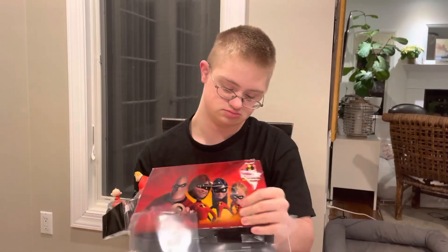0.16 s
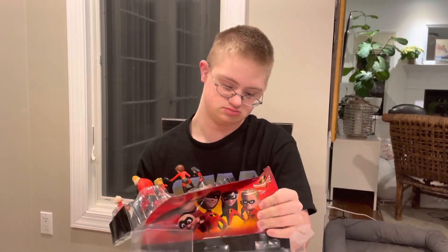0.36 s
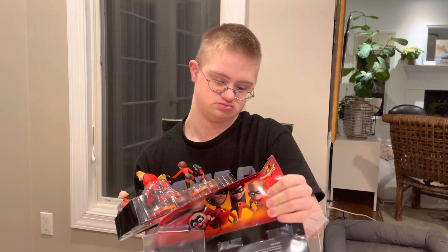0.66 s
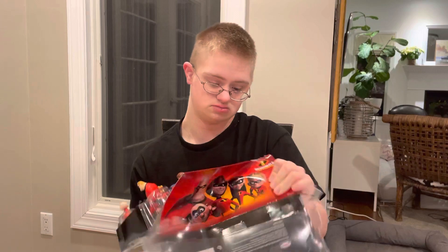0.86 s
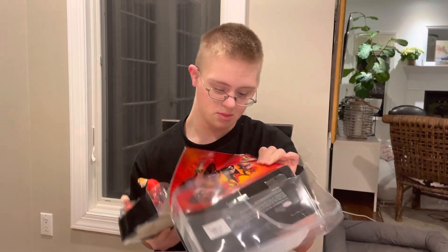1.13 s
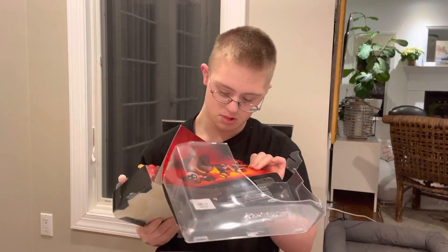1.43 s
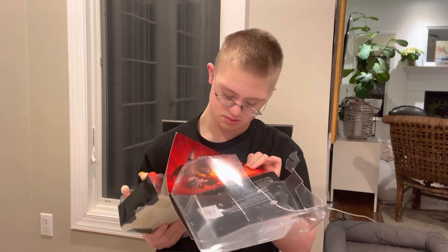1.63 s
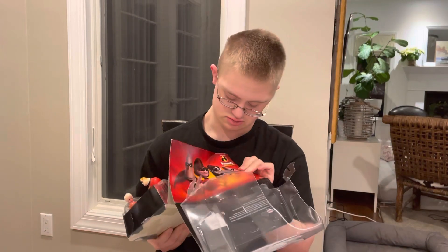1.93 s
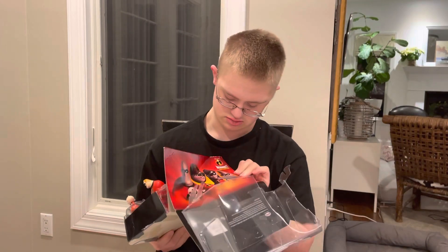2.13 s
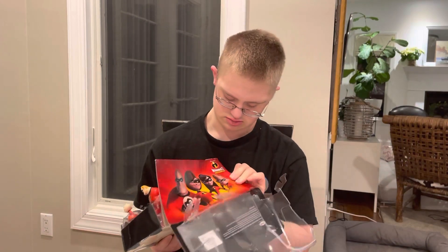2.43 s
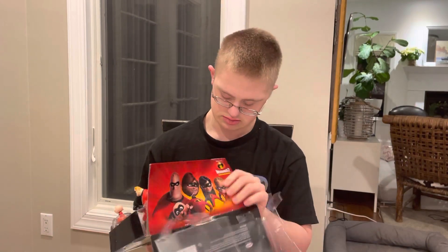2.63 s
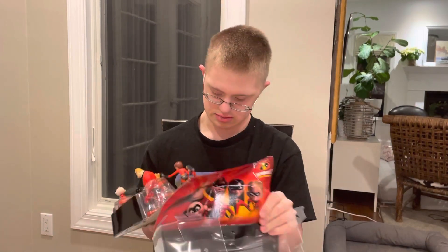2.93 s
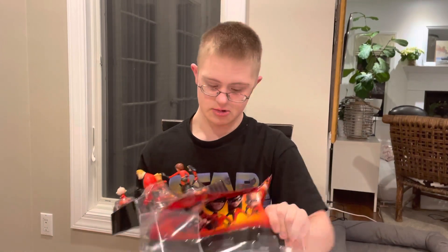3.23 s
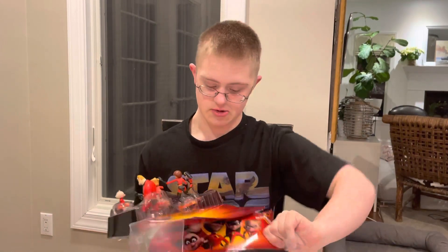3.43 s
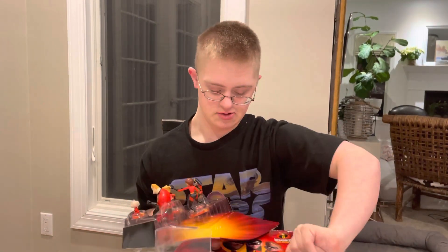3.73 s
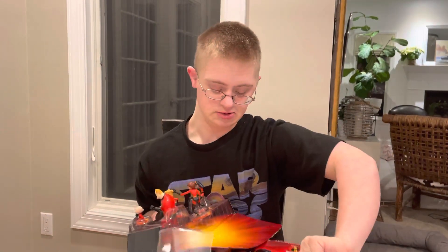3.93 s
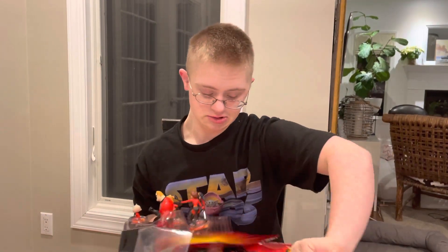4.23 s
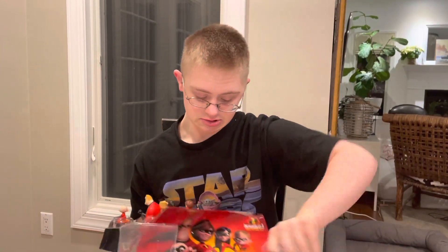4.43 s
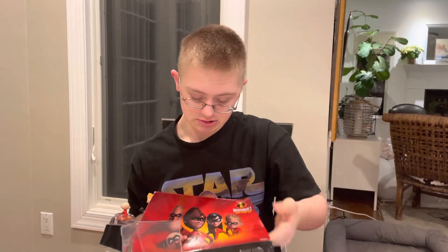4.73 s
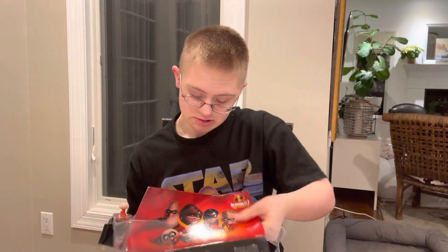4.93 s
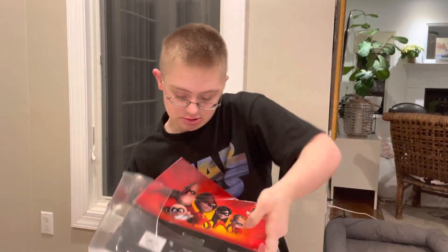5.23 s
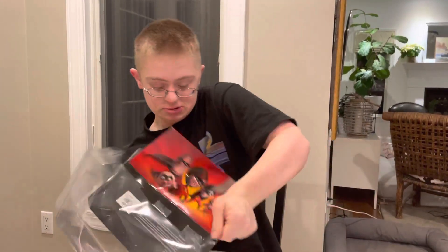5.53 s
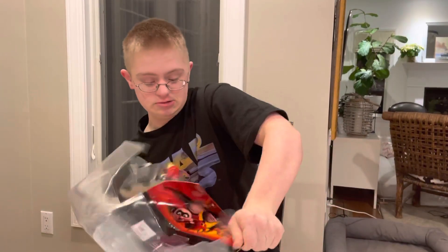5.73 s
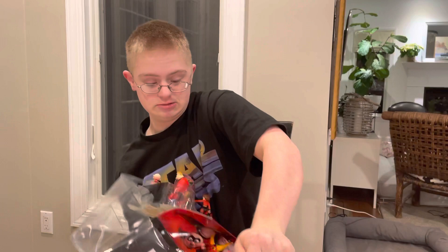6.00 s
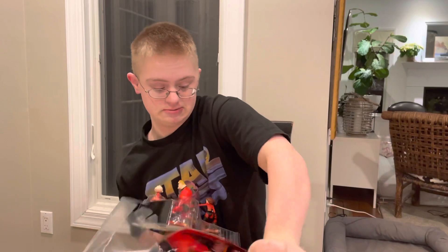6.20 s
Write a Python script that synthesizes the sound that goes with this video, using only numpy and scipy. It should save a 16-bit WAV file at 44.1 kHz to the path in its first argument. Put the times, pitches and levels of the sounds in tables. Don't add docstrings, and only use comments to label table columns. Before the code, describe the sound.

Very close stereo sound of a thin plastic tray being worked out of a cardboard box in a quiet furnished living room, with short reflections and a low hum beneath. From 0 to 0.5 s, rapid hollow pops, crease snaps and soft box thumps; a rough rub near 0.45. Sparser pops around 0.7-0.85, then a single clear snap at 1.23. From about 1.5 to 2.4 it is nearly silent, with faint ticks and rustle. A tiny rising creak leads to a sharp crack at 2.49. Strong pops follow near 2.98 and 3.21, the latter the heaviest. At 3.7-3.8 a scrape carries a brief, thin squeak. Light crackling and sliding run from 4.1 to 5.0, with a snap at 5.15. From 5.35 to 5.7 a bright, dense burst of cracks and scraping; a brief easing, then tumbling hollow buckles and rustle from 6.1 to the end, around 6.4.

```python
import sys
import numpy as np
from scipy import signal
from scipy.fft import rfft, irfft, next_fast_len
from scipy.io import wavfile
from scipy.ndimage import uniform_filter1d, minimum_filter1d

SR = 44100
rng = np.random.default_rng(int(sys.argv[2]) if len(sys.argv) > 2 else 0)


def unload_wav(signal):
    wavfile.write(
        sys.argv[1],
        SR,
        np.round(np.clip(np.atleast_2d(signal).T, -1, 1) * 32767).astype(np.int16),
    )


def voltage_ratio(decibels):
    exponent = np.asarray(decibels, float) / 20
    return 10 ** exponent


N = 280476
SIZE = next_fast_len(N + SR)
BINS = np.arange(SIZE // 2 + 1) * SR / SIZE

# (time [s], bending effort [dB], sliding speed [dB])
HANDS = [(0.0, -45.5, -55.5), (.34, -33.5, -57), (.53, -50, -57), (1.03, -59.5, -67), (1.3, -52.5, -68),
         (1.62, -59.5, -73.5), (2.07, -63, -90), (2.41, -63, -76), (2.55, -52, -53), (2.68, -40, -57),
         (3.17, -36.5, -54.5), (4.11, -48.5, -53), (4.68, -44.5, -61.5), (4.89, -49, -54.5),
         (5.35, -45, -57.5), (5.54, -31.5, -46.5), (5.95, -50, -50.5), (6.36, -32, -48)]
# (time [s], peak [dB], main ring [Hz], crack re peak [dB])
SHARP_BUCKLES = [(0.089, -15.5, 486, -21.5), (0.14, -17, 488, -23), (0.189, -17.5, 321, -32),
                 (0.328, -14, 291.5, -24), (0.398, -20.5, 283, -28), (0.836, -24, 255, -21),
                 (1.002, -51.5, 460, 1), (1.096, -46, 457, -11), (1.145, -42, 545, -10),
                 (1.164, -34, 677, -18.5), (1.233, -23, 476, -16), (1.749, -42, 216, -24),
                 (2.183, -50.5, 390, -4), (2.357, -47, 484, -4.5), (2.484, -19.5, 730, -6.5),
                 (2.487, -5.5, 325, -34), (2.623, -19, 299, -24), (2.72, -19, 770, -16.5),
                 (2.791, -21, 930, -28), (2.919, -22, 337, -15), (3.213, -3, 503, -21),
                 (3.231, -8.5, 503, -22), (3.506, -18, 487, -25.5), (4.132, -29.5, 426, -34),
                 (4.967, -25.5, 680, -19.5), (5.11, -30.5, 347, -18), (5.36, -13, 1005, -13.5),
                 (5.371, -14.5, 474, -18), (5.444, -12.5, 340, -28), (6.113, -23.5, 442, -13)]
# (time [s], peak [dB], main ring [Hz], crack re peak [dB])
SLOW_BUCKLES = [(0.241, -18.5, 352, -30), (0.2915, -12, 361, -25.5), (0.421, -13, 296, -22),
                (0.672, -32, 667, -12), (0.717, -24.5, 364, -13.5), (0.79, -21, 249, -33),
                (1.537, -44, 345, -31), (2.42, -44, 1290, -30), (2.981, -7.5, 760, -16.5),
                (3.028, -11.5, 279, -22), (3.269, -9, 437, -47), (3.327, -12.5, 289, -36),
                (3.579, -22, 419, -28), (4.186, -35.5, 700, -6), (4.256, -32, 305, -23),
                (4.342, -26, 205, -32), (4.479, -29, 326, -27), (4.763, -31, 357, -19),
                (4.866, -30, 240, -19), (5.25, -32, 262, -13.5), (5.464, -14, 706, -9),
                (5.476, -14, 503, -16), (5.572, -28, 372, -11), (5.612, -13.5, 440, -10),
                (6.129, -15, 330, -32), (6.163, -21, 495, -11), (6.189, -19, 337, -29),
                (6.253, -13.5, 293, -22), (6.284, -15.5, 435, -24), (6.304, -12, 275, -34)]
# (frequency [Hz], density [dB per Hz])
SHEET_RATTLE = [(88, -38), (150, -20.5), (231, -9), (286, -3.5), (491, 5), (595, -5), (892, 7), (1020, -25),
                (1500, 8), (1950, -44), (3300, -120)]
# (frequency [Hz], density [dB per Hz])
CARD_SCRAPE = [(2500, -42), (3500, 0.5), (5000, -0.5), (7000, -3.5), (9000, -4), (11000, -9), (13500, -11),
               (16500, -8)]


def rms_one(x):
    return x / np.sqrt(np.mean(x ** 2) + 1e-20)


def in_time(rows):
    s, *columns = np.transpose(rows)
    return [np.interp(np.arange(N) / SR, s, c) for c in columns]


def at_hz(points, hz):
    points = np.array(points)
    return np.interp(np.log(hz + 1), np.log(points[:, 0] + 1), points[:, 1])


def colour(x, spectrum):
    return rms_one(irfft(rfft(x, SIZE) * voltage_ratio(at_hz(spectrum, BINS)), SIZE)[..., :N])


def drift(rate):
    r = np.exp(-80 * np.pi * rate / SR)
    slow = signal.lfilter([1], [1, -2 * r, r * r], rng.standard_normal(N // 40 + 2002))[2000:]
    return np.interp(np.arange(N) / 40, np.arange(len(slow)), rms_one(slow))


def ring(clicks, hz, t60):
    r, w = voltage_ratio(-60 / (t60 * SR)), 2 * np.pi * hz / SR
    return signal.lfilter([0, np.sin(w)], [1, -2 * r * np.cos(w), r * r], clicks + 1e-18)


def struck(table, cycles, gain_db):
    out = np.zeros(N + SR)
    for s, peak_db, hz in table:
        click = np.zeros(SR // 8)
        click[0] = voltage_ratio(peak_db + gain_db)
        at = round(s * SR)
        out[at:at + len(click)] += ring(click, hz, cycles / hz)
    return out[:N]


def grains(per_s, spread_db, clump_db):
    sizes = voltage_ratio(spread_db * np.minimum(rng.exponential(1, N), 4)) * rng.choice([-1, 1], N)
    return sizes * (rng.random(N) < per_s * voltage_ratio(clump_db * drift(25)) / SR)


def rung_grains(slips, low_hz, high_hz, cycles, spectrum):
    dealt = rng.integers(0, 16, N)
    out = np.zeros(N)
    for k, hz in enumerate(np.geomspace(low_hz, high_hz, num=16)):
        out += voltage_ratio(at_hz(spectrum, hz)) * ring(slips * (dealt == k), hz, cycles / hz)
    return rms_one(out)


def thin(x):
    return signal.sosfilt(signal.butter(2, 128, "high", fs=SR, output="sos"), x)


def alike_pair(pair, likeness):
    likeness = np.clip(likeness, 0, 1)
    return np.sqrt(.5 + .5 * likeness) * pair[0] + np.sqrt(.5 - .5 * likeness) * pair[1] * [[1], [-1]]


def room_floor():
    # (frequency [Hz], density [dB per Hz])
    hum_and_air = [(15, -42), (25, -4), (214, -4.5), (404, -20), (575, -14), (694, -15), (1440, -17),
                   (1780, -15.5), (2420, -37), (3450, -32), (7000, -58), (9100, -76), (15400, -120)]
    pair = alike_pair(rfft(rng.standard_normal((2, N)), SIZE), at_hz([(60, 1.0), (500, 0.41), (3000, 0.093)], BINS))
    return voltage_ratio(-60.0) * colour(irfft(pair, SIZE)[:, :N], hum_and_air + [(9000, -73)])


def room():
    # (frequency [Hz], reverberation time [s])
    room_t60 = [(60, 0.13), (250, 0.62), (800, 0.36), (2500, 0.27), (6000, 0.35), (14000, 0.082)]
    # (frequency [Hz], level re direct [dB])
    room_level = [(60, -15), (250, -10), (800, -3), (2500, -3.5), (6000, -6.5), (9000, -5), (14000, -8)]
    # (frequency [Hz], left-right likeness [0..1])
    room_likeness = [(60, 0.48), (250, 0.64), (800, 0.049), (3000, 0.018), (14000, 0.041)]
    t, tail = np.arange(SR) / SR, 0
    white = rng.standard_normal((2, SR)) * np.clip((t - .003) / 0.0037, 0, 1)
    for hz in 44 * 2 ** np.arange(0, 9.):
        dying = white * voltage_ratio(-60 * t / at_hz(room_t60, hz))
        share = np.clip(1 - np.abs(np.log2((BINS + 1) / hz)), 0, 1)
        tail = tail + share * rfft(dying / np.sqrt(np.sum(dying[0] ** 2)), SIZE)
    return alike_pair(tail, at_hz(room_likeness, BINS)) * voltage_ratio(at_hz(room_level, BINS))


def booms():
    # (time [s], peak [dB], pitch [Hz])
    low_blows = [(0.097, -38, 116), (0.299, -38, 127), (0.419, -26, 199), (0.719, -46, 91.5),
                 (0.793, -39, 121), (2.495, -33, 199), (2.529, -36, 127), (2.635, -35, 110),
                 (2.985, -24, 199), (3.219, -27, 180), (3.329, -32, 199), (3.745, -38, 124),
                 (4.199, -50, 137), (4.344, -36, 129), (5.159, -36, 178), (5.449, -37, 199),
                 (5.609, -39, 121), (6.129, -42, 161), (6.25, -30, 194)]
    return signal.lfilter(*signal.butter(2, 260, fs=SR), struck(low_blows, cycles=24, gain_db=-4))


def rub():
    # (frequency [Hz], level re sliding speed [dB])
    tray_resonances = [(1750, -6.5), (2500, -12), (3900, -12)]
    slide_db = in_time(HANDS)[1]
    friction = rng.standard_normal(N) * voltage_ratio(3.0 * drift(9.7))
    return voltage_ratio(slide_db) * sum(voltage_ratio(level_db) * rms_one(ring(friction, hz, t60=0.0072)) for hz, level_db in tray_resonances)


def squeak():
    # (time [s], pitch [Hz], level [dB])
    edge_squeak = [
        (3.68, 860, -70),
        (3.71, 849, -54),
        (3.75, 792, -41),
        (3.79, 799.4, -40.5),
        (3.83, 830, -71),
        (3.95, 833, -68),
        (4.3, 820, -60),
        (4.45, 830, -66),
    ]
    # (multiple of the pitch [1], level [dB])
    partials = [(1, 5), (2.15, -0.5), (3.1, 0), (4.9, -12)]
    hz, level_db = in_time(edge_squeak)
    turn = 2 * np.pi * np.cumsum(hz * (1 + 0.0148 * drift(40.0))) / SR
    lines = sum(voltage_ratio(part_db + 1.5 * drift(50)) * np.sin(multiple * turn) for multiple, part_db in partials)
    return voltage_ratio(level_db) * lines * (level_db > np.min(level_db))


def creak():
    # (time [s], pitch [Hz], level [dB])
    strain = [
        (2.36, 1000, -72),
        (2.405, 1200, -59),
        (2.425, 1453, -49),
        (2.45, 1950, -47),
        (2.47, 1900, -54),
        (2.485, 1800, -62),
    ]
    width_hz = 520
    hz, level_db = in_time(strain)
    turn = 2 * np.pi * np.cumsum(hz) / SR
    line = drift(width_hz) * np.sin(turn) + drift(width_hz) * np.cos(turn)
    t = np.arange(N) / SR
    return voltage_ratio(level_db) * line * ((t > strain[0][0]) & (t < strain[-1][0]))


def drags():
    # (time of the height [s], fall [s], low [dB], bright [dB], chatter [Hz])
    rough_drags = [(.46, 0.059, -37.5, -42, 3240), (5.655, 0.045, -29, -50, 2200),
                   (1.86, 0.074, -69, -72.5, 3500), (2.405, 0.055, -64, -61.5, 1350),
                   (5.385, 0.036, -43, -37.5, 2500), (2.514, 0.041, -48, -38, 2400),
                   (3.25, 0.038, -50, -38.5, 2500), (4.33, 0.063, -55, -54, 3900),
                   (4.8, 0.053, -55, -50.5, 2600), (2.74, .03, -51, -49, 2390),
                   (1.55, 0.091, -64, -74, 1500), (2.455, 0.017, -72, -45, 1530),
                   (3.009, 0.068, -26.5, -38.5, 2300), (3.439, 0.077, -47, -51, 3900),
                   (3.72, 0.06, -46, -39.5, 2675), (3.794, .018, -31.5, -27, 2700),
                   (3.885, .022, -56, -39.5, 2470), (4.395, 0.015, -43, -41.5, 3050),
                   (4.502, 0.028, -36, -69, 1810), (4.552, 0.0098, -45, -47, 2420),
                   (4.585, 0.056, -35, -60, 2430), (4.95, 0.036, -42.5, -52, 2420),
                   (5.153, 0.018, -31.5, -29, 2430), (5.48, 0.048, -44, -28, 2100),
                   (5.842, 0.054, -38.5, -37, 3530), (6.018, 0.031, -44, -41.5, 4050),
                   (6.151, 0.045, -36, -33.5, 2000), (6.2, 0.042, -35, -34, 3340),
                   (6.27, 0.044, -27, -31.5, 5100)]
    t, out = np.arange(N) / SR, np.zeros(N)
    low = rung_grains(grains(1500, spread_db=1.5, clump_db=3.0), 205.0, 1003, 6.4, SHEET_RATTLE)
    slips = rms_one(grains(2700, spread_db=1.0, clump_db=3.5))
    hiss = colour(slips, [(900, 1.1), (1600, 4.4)] + CARD_SCRAPE[1:])
    for s, fall, low_db, bright_db, hz in rough_drags:
        near = slice(max(round((s - .2) * SR), 0), round((s + .3) * SR))
        width = np.where(t[near] < s, 0.71 * fall, fall)
        force = np.exp(-((t[near] - s) / width) ** 2)
        chatter = rms_one(ring(slips[near], hz, 61.0 / hz))
        out[near] += force * (voltage_ratio(low_db) * low[near] + voltage_ratio(bright_db) * (hiss[near] + 0.075 * chatter))
    return out


def ticks():
    # (time [s], peak [dB], pitch [Hz])
    small_creases = [(0.238, -30.5, 5330), (1.2341, -27.5, 3530), (2.489, -16.5, 3860), (3.328, -26, 2490),
                     (4.446, -40, 4500), (0.1885, -27.5, 2180), (0.277, -30.5, 2430), (0.3264, -29, 1840),
                     (0.398, -28.5, 2540), (0.4419, -25.5, 3380), (1.4072, -43.5, 3100),
                     (2.1848, -50, 2060), (2.9745, -20, 2030), (3.0765, -20.5, 2270), (3.4104, -30.5, 4000),
                     (3.4372, -35, 3700), (3.579, -29.5, 2450), (3.7542, -25, 2570), (3.7834, -26, 2520),
                     (3.9843, -40, 2370), (4.3924, -35, 2270), (4.5155, -40, 3440), (4.9645, -31, 2380),
                     (5.3414, -40, 1880), (5.361, -19, 2250), (5.434, -22, 2000), (5.467, -12, 2140),
                     (6.08, -33, 3370), (6.1424, -32, 3630), (6.2443, -23, 1960)]
    out, t = np.zeros(N + SR), np.arange(SR // 40) / SR
    dull = signal.butter(1, [1200, 6000], "band", fs=SR)
    for s, peak_db, hz in small_creases:
        tone = np.sin(2 * np.pi * hz * t) * voltage_ratio(-60 * t / 0.0093)
        burst = 0.92 * rng.standard_normal(len(t)) * voltage_ratio(-60 * t / 0.0083)
        at = round(s * SR)
        out[at:at + len(t)] += voltage_ratio(peak_db + 1.5) * (tone + burst)
    return signal.lfilter(*dull, out[:N])


def snaps():
    # (time [s], peak [dB], pitch [Hz])
    hard_creases = [(0.0881, -20, 1670), (0.1395, -26, 1980), (0.2368, -31, 1500), (0.2504, -34, 2120),
                    (0.2762, -29, 2860), (0.2966, -25, 2480), (0.3266, -19.5, 1830), (0.3444, -30, 1850),
                    (0.398, -27, 2600), (0.4178, -25, 1890), (0.44, -26, 3210), (0.4554, -32, 1540),
                    (0.7164, -29, 1640), (0.8339, -31, 1550), (1.233, -18, 1630), (2.4842, -17, 2350),
                    (2.4884, -14, 1590), (2.5114, -26, 1640), (2.5374, -27, 2320), (2.6228, -32, 1590),
                    (2.719, -19, 1550), (2.791, -27, 1730), (2.9206, -28, 1660), (2.9784, -7, 2040),
                    (3.0347, -17, 1590), (3.1641, -31, 1720), (3.2103, -18, 1880), (3.2312, -10, 2860),
                    (3.3272, -24, 1720), (3.5053, -34, 2400), (3.669, -33, 1820), (3.7863, -19, 2460),
                    (3.869, -29, 2400), (4.3094, -40, 1730), (4.398, -32, 2780), (4.544, -32, 2310),
                    (4.5527, -25, 2110), (4.6344, -43, 1570), (4.964, -32, 1500), (5.1456, -16.5, 2190),
                    (5.3504, -29, 1500), (5.3596, -14, 2210), (5.3704, -18, 2310), (5.4433, -12.5, 2060),
                    (5.476, -8, 1610), (5.5444, -19, 1550), (5.61, -19, 2070), (5.655, -23, 2330),
                    (5.69, -29, 2030), (5.7318, -31, 1950), (5.8036, -37, 2220), (5.8181, -28, 1650),
                    (6.1117, -23, 1480), (6.1274, -29, 1500), (6.1634, -20, 1880), (6.1762, -21, 1630),
                    (6.25, -24, 2060), (6.264, -23, 1690), (6.2861, -21, 2010), (6.3026, -21, 1500)]
    # (time [s], peak [dB], pitch [Hz])
    panels = [(0.093, -24, 474), (0.145, -22, 487), (0.242, -21, 316), (0.261, -24, 285), (0.297, -17, 377),
              (0.331, -16.5, 310), (0.351, -18, 261), (0.421, -13.5, 256), (0.793, -27.5, 253),
              (0.836, -30, 256), (2.496, -13, 438), (2.626, -26, 293), (2.98, -12.5, 431),
              (3.211, -17, 515), (3.239, -16, 493), (3.274, -12.5, 447), (3.334, -19, 300),
              (4.344, -25.5, 148), (4.494, -28, 297), (4.569, -26, 304), (4.599, -26, 436),
              (5.384, -21, 544), (5.453, -20, 436), (5.489, -20, 614), (5.624, -20, 350), (5.654, -19, 689),
              (6.116, -21.5, 304), (6.13, -16, 318), (6.144, -24, 283), (6.186, -25, 339),
              (6.219, -25, 660), (6.255, -17, 296), (6.267, -19, 288), (6.286, -20, 331), (6.311, -21, 272),
              (6.333, -21, 342)]
    upper = [(s, peak_db, min(hz * 2.3, 15000)) for s, peak_db, hz in hard_creases]
    thump = signal.lfilter(*signal.butter(1, 900, fs=SR), struck(panels, cycles=12.3, gain_db=-2.5))
    return struck(hard_creases, cycles=12.5, gain_db=-3) + struck(upper, cycles=7.4, gain_db=-9.0) + thump


def rim():
    # (time [s], peak [dB], pitch [Hz])
    rim_snaps = [(5.352, -28, 1140), (.0895, -24, 790), (.142, -20.5, 1200), (0.3, -31, 910),
                 (2.485, -21.5, 1440), (2.72, -21, 1630), (2.98, -16, 1150), (5.372, -19, 1110),
                 (5.445, -14.5, 1070), (.1895, -27, 1040), (.42, -23.5, 716), (2.4895, -15, 1620),
                 (5.371, -20, 4200), (1.2348, -18, 1037), (1.2345, -19, 1290), (2.4888, -9.5, 1014),
                 (3.213, -8, 905), (.293, -25, 860), (2.791, -29, 930), (3.234, -18, 760),
                 (3.506, -24, 850), (5.156, -23, 1060), (5.577, -27, 890), (6.165, -24, 877),
                 (5.8, -19, 950), (6.334, -24, 875), (5.467, -16, 1000), (.791, -28.5, 715)]
    return struck(rim_snaps, cycles=24.6, gain_db=0.5)


def shudder():
    level_db, rise_s, t60_s = -26, 0.026, 0.48
    s, peak_db = np.transpose(SHARP_BUCKLES + SLOW_BUCKLES)[:2]
    power = np.zeros(N)
    power[(s * SR).astype(int)] = voltage_ratio(peak_db + level_db) ** 2
    fall, rise = voltage_ratio(-120 / (t60_s * SR)), np.exp(-1 / (rise_s * SR))
    return np.sqrt(signal.lfilter([1 - rise], np.convolve([1, -fall], [1, -rise]), power + 1e-18))


def handling():
    # (frequency [Hz], density [dB per Hz])
    box_rumble = [(24, -40), (40, -14), (113, 0), (145, -6), (231, -6.5), (300, -3), (390, -21),
                  (660, -120)]
    # (frequency [Hz], width [Hz], level re box rumble [dB])
    standing_wave = (127.3, 12, -4)
    bend_db, slide_db = in_time(HANDS)
    tremble = shudder()
    box = colour(rng.standard_normal(N), box_rumble) * voltage_ratio(2.0 * drift(7.3))
    hz, width_hz, boom_db = standing_wave
    boom = rms_one(ring(rng.standard_normal(N), hz, 2.6 / width_hz)) * voltage_ratio(boom_db)
    sheet = thin(rung_grains(grains(500, spread_db=2.5, clump_db=5.0), 163.3, 1228, 17.0, SHEET_RATTLE))
    crease_slips = grains(900, spread_db=-2.0, clump_db=5.5)
    creases = thin(rung_grains(crease_slips, 1077, 4040, 12.4, [(1100, -3.0), (3600, -4)]))
    scrape = colour(grains(3500, spread_db=2.5, clump_db=3.5), [(1800, -40)] + CARD_SCRAPE)
    box_db = bend_db.mean() + 0.72 * (bend_db - bend_db.mean()) - 7.5
    crease_db = bend_db + 0.47 * (slide_db - bend_db) - 2.5
    return (np.hypot(voltage_ratio(box_db), tremble * voltage_ratio(-4)) * (box + boom)
            + np.hypot(voltage_ratio(bend_db - 5), tremble) * sheet
            + np.hypot(voltage_ratio(crease_db), tremble * voltage_ratio(-5.5)) * creases
            + np.hypot(voltage_ratio(slide_db - 2), tremble * voltage_ratio(-24)) * scrape)


def buckles(table, rise):
    # (frequency [Hz], level re peak [dB])
    plate_modes = [(200, -28.5), (300, -18.5), (600, -21), (1000, -14.5), (1700, -30)]
    out, clacks, cracks = np.zeros((3, N + SR))
    t = np.arange(SR // 7) / SR
    onset = 1 - np.exp(-(t / rise) ** 2)
    clack_fall = voltage_ratio(-60 * t / (0.025 + 5.3 * rise)) + 0.16 * voltage_ratio(-60 * t / 0.16)
    crack_fall = voltage_ratio(-60 * t / (0.012 + 6.9 * rise)) + 0.24 * voltage_ratio(-60 * t / 0.15)
    for (s, peak_db, low_hz, crack_db), draw in zip(table, rng.random((len(table), 3, 26))):
        high_hz = 868 * (1 + .25 * (draw[0, 1] - .5))
        clack_db = -13 + 0.3 * (crack_db + 18.5) + 0.14 * (peak_db + 19)
        hz = np.r_[low_hz, high_hz, 220 * 7.5 ** draw[0, 2:]][:, None]
        plate_db = at_hz(plate_modes, hz[2:, 0]) + 8.0 * (draw[1, 2:] - .5)
        level = voltage_ratio(np.r_[-11.5, -6.0, plate_db])[:, None]
        life = 0.079 * (600 / hz) ** 0.73
        life[1] *= .45
        late = np.maximum(t - (2.482 / hz + 2 * rise) * draw[2][:, None], 0)
        swell = 1 - np.exp(-late * hz / 0.78)
        body = np.sum(level * swell * np.sin(2 * np.pi * hz * late) * voltage_ratio(-60 * late / life), axis=0)
        start = round((s - rise) * SR)
        here = slice(start, start + len(t))
        out[here] += voltage_ratio(peak_db) * body
        clacks[here] += voltage_ratio(peak_db + clack_db) * onset * clack_fall
        cracks[here] += voltage_ratio(peak_db + crack_db) * onset * crack_fall
    return np.array([out, clacks, cracks])[:, :N]


def pops():
    # (frequency [Hz], density [dB per Hz])
    clack_spectrum = [(700, -16), (1200, 2.5), (2000, 1.5), (3000, -7.5), (4500, -36)]
    # (frequency [Hz], density [dB per Hz])
    crack_spectrum = [(1200, -33), (2500, 6.5), (5000, 3.5), (7500, -5.5), (11000, -10), (16000, -12.5)]
    body, clacks, cracks = buckles(SHARP_BUCKLES, rise=0.00024) + buckles(SLOW_BUCKLES, rise=0.003016)
    clack = colour(rng.standard_normal(N), clack_spectrum) * clacks * voltage_ratio(4.1 * drift(117))
    crack = colour(rng.standard_normal(N), crack_spectrum) * cracks * voltage_ratio(-1.0 + 4.6 * drift(144))
    return signal.sosfilt(signal.butter(2, 200, "high", fs=SR, output="sos"), body + clack + crack)


def scene():
    # (frequency [Hz], lead of the left port [radians])
    port_lead = [(0, 0), (690, 0.3), (2240, 0.7), (3620, 0.3), (4910, 0.7), (6290, -0.4), (7410, -2.1),
                 (7670, -3.0), (8870, -3.3), (10200, -5.5), (10500, -6.2), (12800, -6.5), (13900, -9.5),
                 (16100, -9.4)]
    # (frequency [Hz], left over right [dB])
    port_tilt = [(60, -1.0), (110, -1.5), (200, -0.5), (380, 0.5), (700, 0.0), (1290, -0.5), (2380, -0.5),
                 (4400, 1.5), (8120, 0.5), (15000, 0.0)]
    side = np.array([[.5], [-.5]])
    lead = np.interp(BINS, *np.transpose(port_lead))
    ports = np.exp(1j * lead * side) * voltage_ratio(at_hz(port_tilt, BINS) * side)
    tray = handling() + pops() + thin(ticks() + drags() + squeak() + rim() + snaps() + rub())
    source = tray + booms() + creak()
    path = ports + room()
    return irfft(rfft(source, SIZE) * path, SIZE)[:, :N] + room_floor()


def starve(x, holes_hz, steady):
    inside = sum((BINS > low) & (BINS < high) for low, high in holes_hz)
    return x - steady * irfft(rfft(x, SIZE) * inside, SIZE)[:N]


def some_blocks(share):
    chosen = np.repeat(rng.random(N // 1024 + 1) < share, 1024)[:N]
    return uniform_filter1d(1. * chosen, size=512)


def steadiness(total):
    full_moments = [.14, .42, .89, 2.49, 4.86, 5.36, 5.61, 2.93, 2.98, 3.08, 3.66, 3.785, 3.87, 5.43, 5.82,
                    6.11]
    treble = np.diff(total, prepend=0) ** 2
    jump = uniform_filter1d(treble, size=128) / uniform_filter1d(treble, size=1024, origin=511)
    calm = 1. * (jump < 9.0)
    for s in full_moments:
        calm[round(s * SR) - 300:round(s * SR) + 500] = 0
    return uniform_filter1d(minimum_filter1d(calm, size=400), size=128)


def low_pass(x):
    return signal.sosfilt(signal.butter(12, 16500, fs=SR, output="sos"), x)


def record(dry):
    # (low edge [Hz], high edge [Hz])
    sum_holes = [(7750, 8800), (13800, 22000)]
    # (low edge [Hz], high edge [Hz])
    difference_holes = [(10400, 12400), (15900, 22000)]
    # (low edge [Hz], high edge [Hz])
    sum_fringe = [(7500, 7750), (8800, 9400), (12900, 13800)]
    # (low edge [Hz], high edge [Hz])
    difference_fringe = [(12400, 13000), (13000, 13500)]
    dry = signal.sosfilt(signal.butter(3, 45, "high", fs=SR, output="sos"), dry)
    total, difference = (dry[0] + dry[1]) / 2, (dry[0] - dry[1]) / 2
    steady = steadiness(total)
    total = starve(total, sum_holes, steady)
    total = starve(total, sum_fringe, steady * some_blocks(.35))
    difference = starve(difference, difference_holes, steady)
    difference = starve(difference, difference_fringe, steady * some_blocks(.35))
    return low_pass(np.array([total + difference, total - difference]))


dry = scene()
out = record(dry)
unload_wav(out)
```